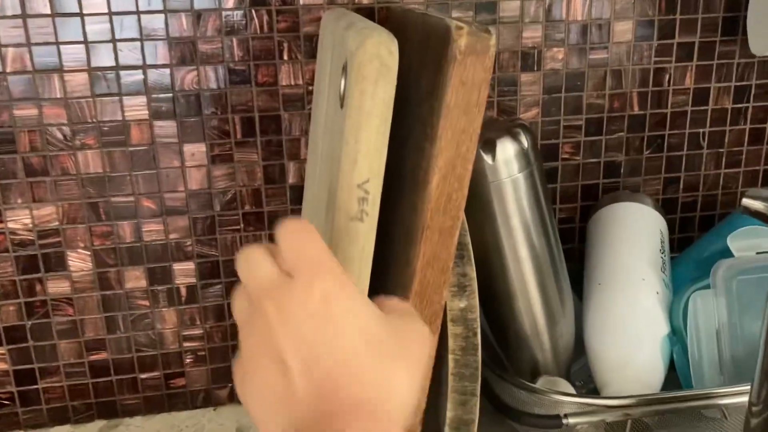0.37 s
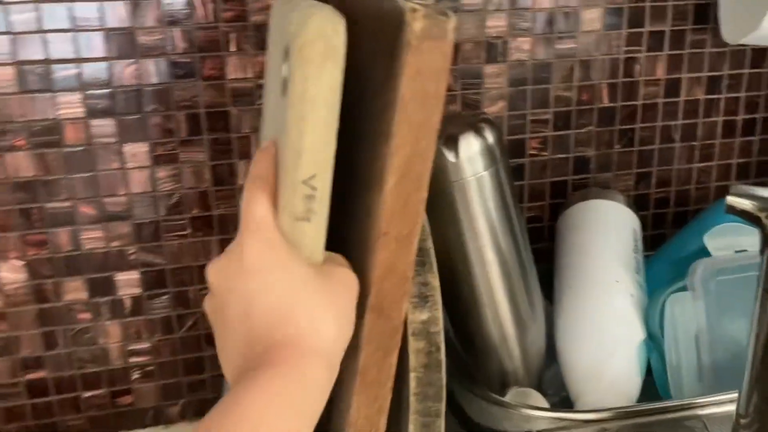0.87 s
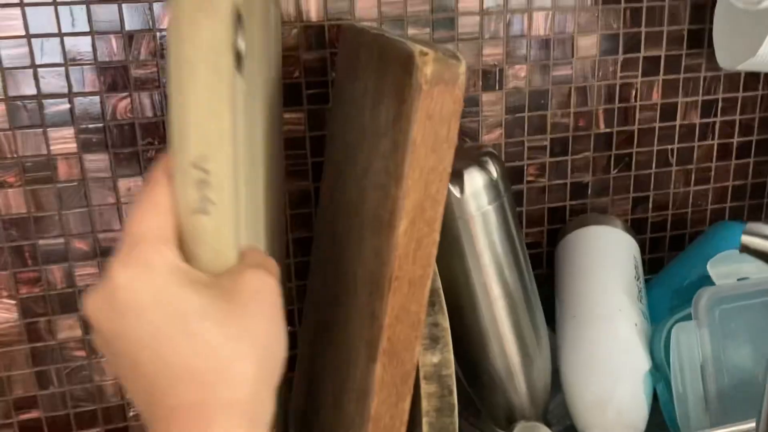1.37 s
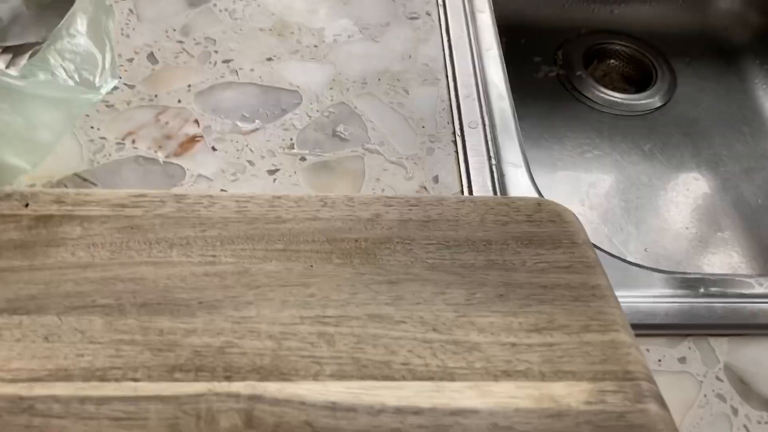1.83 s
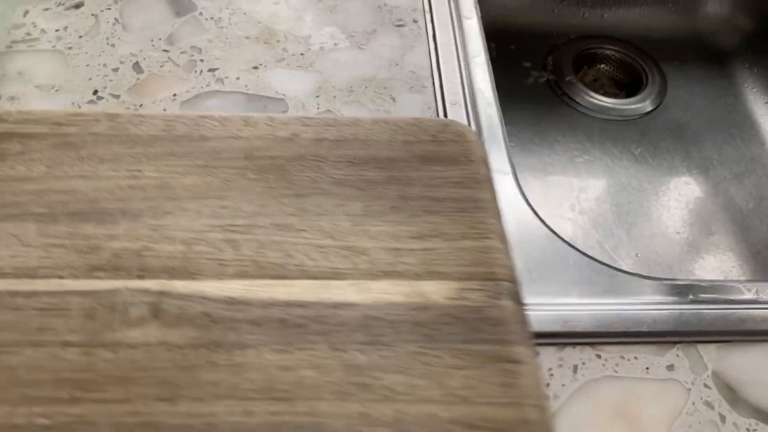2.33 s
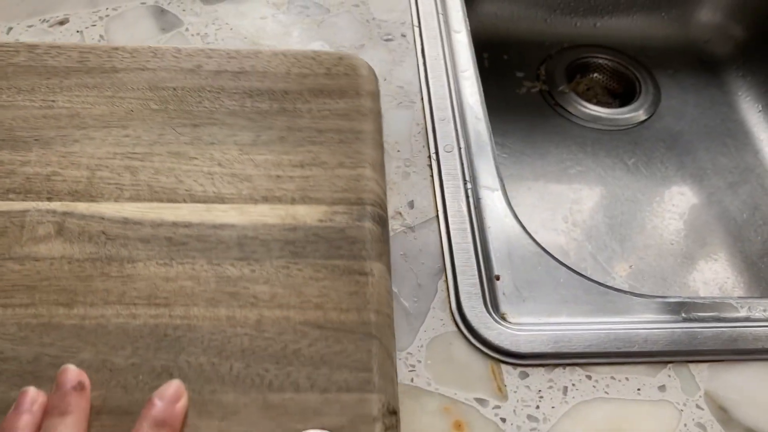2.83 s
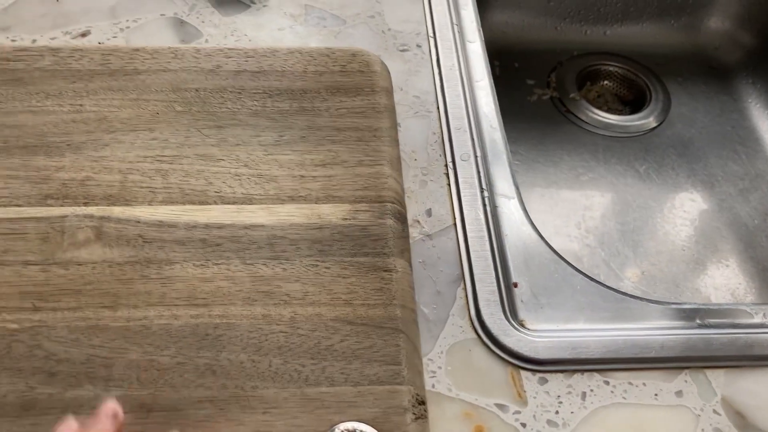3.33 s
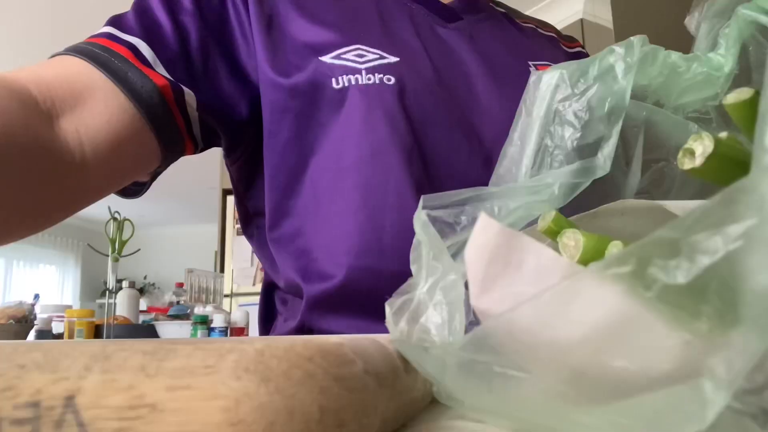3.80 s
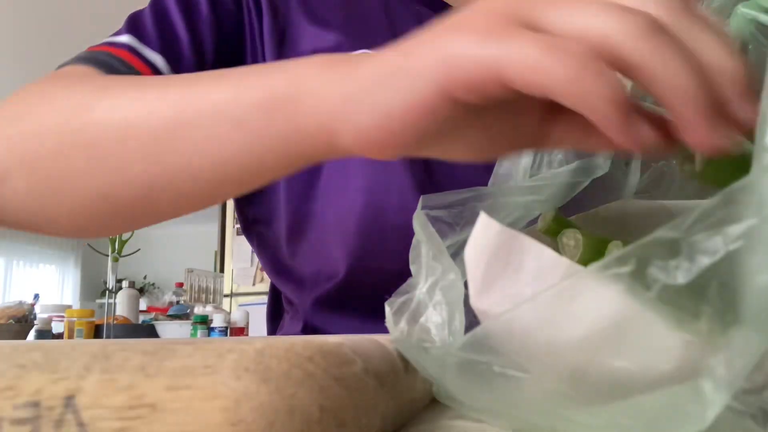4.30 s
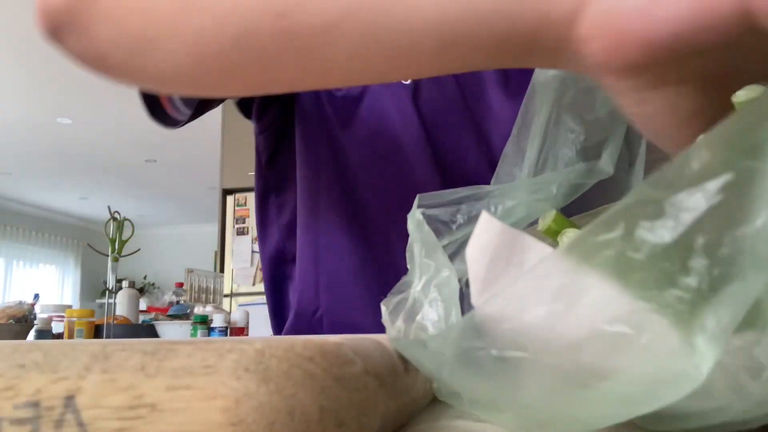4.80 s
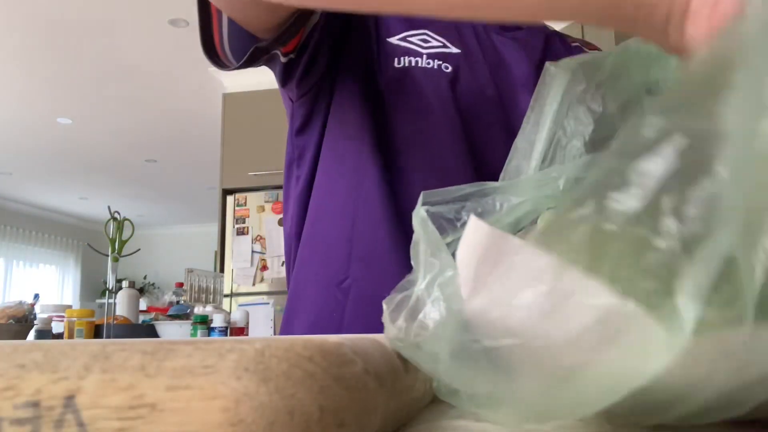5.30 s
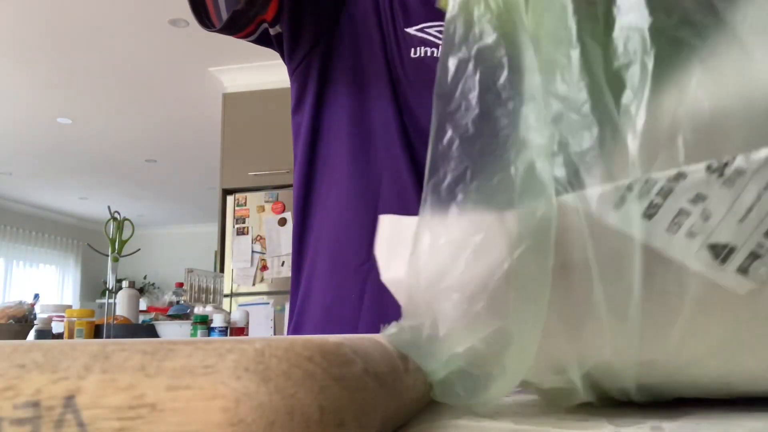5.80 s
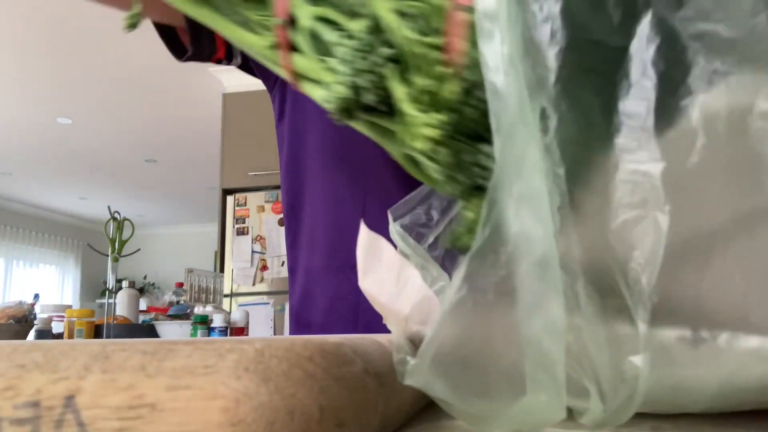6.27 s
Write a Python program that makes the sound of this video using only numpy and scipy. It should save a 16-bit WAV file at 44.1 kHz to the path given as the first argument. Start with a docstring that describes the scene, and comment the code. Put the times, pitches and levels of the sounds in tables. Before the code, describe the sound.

A handheld phone hears a hard, echoing kitchen close up, with faint wavering air and low hand bumps throughout. From 0 to 1 s there are only very soft taps of a wooden board in a steel rack, then a dull knock at 1.0. At 1.16-1.2 a cluster of hollow wood blows jangles the wires brightly; more knocks follow at 1.35, the hardest crack at 1.65 and a ringing clatter at 1.74. At 1.83 the sound cuts to a bench, on the left: gritty wood scrapes over stone from 2.05 to 2.85, hissing and singing, strongest near 2.45. The board slaps flat at 3.14, then its echo fades into quiet. From 3.8 the last part begins: sparse plastic crackle on the right from 4.4, a burst of snaps at 5.06, loud crumpling from 5.6, tiny squeaks around 5.8, and dense snapping at 6.0-6.2 before ending at 6.4.

```python
"""A kitchen in three joined shots, heard by a phone, over wavering air and low hand bumps.
First a wooden board is pulled from a steel dish rack: blows ring modes of wood and wire, with noisy clatter.
Then it slides over a stone bench, gritty clicks hissing and singing in its modes, and drops flat with a slap.
Last a hand pulls greens from a thin plastic bag: clumped clicks crackle, noise bursts snap, gliding tones squeak."""
import sys
import numpy as np
from scipy import signal
from scipy.fft import rfft, irfft, next_fast_len
from scipy.io import wavfile
from scipy.ndimage import uniform_filter1d

SR = 44100
rng = np.random.default_rng(int(sys.argv[2]) if len(sys.argv) > 2 else 0)


def put_to_file(sound):
    """Save the sound as 16-bit audio at rate SR, in the file named by the first command-line argument."""
    columns = np.atleast_2d(sound).T  # one column per channel
    safe = np.clip(columns, -1, 1)
    whole_steps = np.round(safe * 32767)
    wavfile.write(sys.argv[1], SR, whole_steps.astype(np.int16))


def level_to_linear(level):
    """Convert decibel levels to linear amplitude factors, elementwise."""
    exponent = np.asarray(level, float) / 20
    return 10 ** exponent


N = 282195  # samples in the whole scene


def evened(x):
    """Scales a sound to an rms of 1."""
    return x / np.sqrt(np.mean(x ** 2) + 1e-20)


def read(points, hz, column=1):
    """Reads a table column on a log-frequency axis."""
    table = np.transpose(points)
    return np.interp(np.log(hz + 1), np.log(table[0] + 1), table[column])


def curve(rows, column=1):
    """Joins a table column in time; -200 outside the table, far below hearing for a level."""
    table = np.transpose(rows)
    return np.interp(np.arange(N) / SR, table[0], table[column], left=-200, right=-200)


def shaped(x, gain):
    """Filters x by gain, a function of Hz."""
    size = next_fast_len(x.shape[-1] + 2048)
    spectrum = rfft(x, size) * gain(np.fft.rfftfreq(size, 1 / SR))
    return irfft(spectrum, size)[..., :x.shape[-1]]


def coloured(x, spectrum):
    """Gives x the colour of a spectrum table, at an rms of 1."""
    return evened(shaped(x, lambda hz: level_to_linear(read(spectrum, hz))))


def wander(width):
    """A random drift with an rms of 1, smoothed over width samples."""
    return evened(uniform_filter1d(rng.standard_normal(N), width))


def clicks(per_s, spread_db, size=N):
    """Random clicks of either sign, a few of them large."""
    chance, sign = rng.random((2, size))
    height = level_to_linear(spread_db * np.minimum(rng.exponential(1, size), 4))
    return (chance < per_s / SR) * np.sign(sign - .5) * height


def add(mix, s, sound):
    """Lays a sound into the mix at s seconds."""
    part = mix[round(s * SR):][:len(sound)]
    part += sound[:len(part)]


# Kitchen air by the rack and by the bench. Each row: frequency in Hz, density in dB per Hz.
RACK_AIR = [(59, -51), (100, -19.5), (343, -12), (381, -10.5), (662, -27.5), (9410, -45.5), (11400, -38),
            (16000, -56)]
BENCH_AIR = [(59, -31.5), (100, -8.5), (442, -15.5), (676, -29), (768, -33.5), (13800, -58), (16000, -52)]


def air(spectrum):
    """Coloured noise, nearly alike in both ears in the bass and mostly separate above, wavering in level."""
    left, other = rng.standard_normal((2, N))
    same = lambda hz: np.clip(.9 - hz / 900, .1, 1)
    right = shaped(left, same) + shaped(other, lambda hz: np.sqrt(1 - same(hz) ** 2))
    return coloured(np.array([left, right]), spectrum) * level_to_linear(2 * wander(3000))


# Low bumps, the hand moving on the phone. Each row: time in seconds, level in dB, hold in seconds.
HAND_BUMPS = [(.47, -61, 0.044), (1.015, -39, 0.199), (1.426, -47.5, 0.0128), (1.68, -32, .03),
              (2.906, -53, 0.024), (3.15, -32.5, 0.0305), (3.28, -45, 0.0426), (4.92, -44.5, 0.0056),
              (5.134, -59.5, 0.007), (5.97, -43.5, 0.078), (6.09, -44.5, 0.022), (6.313, -51, 0.0059)]
BUMP_RISE_DB_PER_S, BUMP_FALL_DB_PER_S = 700.5, 196


def handling(grip_db):
    """Low noise for the grip's steady tremor and the hand's bumps, partly opposite at the two microphones."""
    t = np.arange(N) / SR
    level = level_to_linear(grip_db)
    for s, db, hold in HAND_BUMPS:
        rise_db = BUMP_RISE_DB_PER_S * np.maximum(s - t, 0)
        fall_db = BUMP_FALL_DB_PER_S * np.maximum(t - s - hold, 0)
        level = level + level_to_linear(db - rise_db - fall_db)
    push, twist = rng.standard_normal((2, N))
    pair = np.array([push - .5 * twist, push + .8 * twist])
    return level * coloured(pair, [(15, -54), (35, -13.5), (55, 0.5), (95, -9.5), (130, -12.0), (300, -61.5)])


def ring(modes):
    """Impulse response of decaying sines, given as (Hz, dB, t60 in s), scaled to peak 1."""
    t = np.arange(SR // 2) / SR
    out = sum(level_to_linear(db - 60 * t / t60) * np.sin(2 * np.pi * hz * t) for hz, db, t60 in modes)
    return out / abs(out).max()


def contact(ms, rattle_t60, rattle_db):
    """Force of a blow: one push, then ever weaker rebounds; longer contact is duller."""
    t = np.arange(SR // 3) / SR
    train = level_to_linear(rattle_db - 60 * t / rattle_t60) * evened(clicks(1000, 0.978, size=len(t)))
    train[0] = 1
    u = t[:400] / (ms / 4000)  # the push peaks a quarter of the way into the contact
    push = u * np.exp(-u)
    return np.convolve(train, push / np.sum(push))


def clatter(force, keep, spectrum):
    """A burst of noise for every contact; it swells for a moment and dies."""
    dying = signal.lfilter([1], [1, -keep], abs(force))
    burst = signal.lfilter([1 - .93], [1, -.93], dying)
    return burst * coloured(rng.standard_normal(len(force)), spectrum)


# Blows in the rack. Each row: start in seconds, drive to the board, wires and clatter in relative dB,
# rattle t60 in seconds.
RACK_HITS = [(.003, -51, -57, -55, 0.117), (0.443, -56.5, -57.5, -52.5, 0.297),
             (.809, -54.5, -55.5, -42.5, 0.0593), (.948, -46.5, -58, -45.5, 0.054),
             (1.004, -23.5, -62.5, -38, 0.326), (1.112, -48, -47, -45, 0.54),
             (1.162, -22, -14.5, -13.5, 0.089), (1.168, -12.5, -20.5, -23, 0.2),
             (1.208, -20.5, -23, -26, 0.091), (1.341, -14, -28, -27.5, 0.15), (1.417, -19, -53, -45.5, .05),
             (1.641, -11.5, -51.5, -19, 0.09), (1.649, 8, -43, -13, 0.012),
             (1.743, -12, -15.5, -14.5, 0.097)]
# Modes of the wooden board. Each entry: frequency in Hz.
BOARD_MODES_HZ = [124, 228, 375, 540, 640, 880, 1010, 1232, 1420, 1530, 1910, 2250, 2570, 3070, 3430]
# The same modes' strength. Each row: relative dB held in the air, relative dB lying on stone,
# t60 in seconds in the air.
BOARD_MODES = [(-25, -19, 0.14), (-8.5, 7, 0.046), (-2, -15, 0.056), (-11, -4, 0.087), (-1.5, 1, 0.04),
               (-19, -3.5, 0.06), (-9.5, 0.5, 0.019), (8, 14.5, 0.016), (-8.5, -27, 0.04),
               (-3.5, -23, 0.019), (-16.5, 12.5, 0.014), (-12, -3.5, 0.15), (-21, -5.5, 0.21),
               (-16.5, -15.5, 0.073), (-18.5, -34.5, 0.05)]
# Steel wires, the near and the far set. Each row: frequency in Hz, relative level in dB, t60 in seconds.
NEAR_STEEL = [(2400, -12, .2), (2735, -10, .4), (2972, -10, .15), (3580, -12, .2), (4048, -10, .08),
              (4403, -4, .15), (5280, -12, .12), (5992, -12, .2), (6508, -13, .2), (6998, -12, .1),
              (7516, -4, .13), (10340, -22, .2), (11490, -24, .2)]
FAR_STEEL = [(1696, -6, .07), (2800, 3, .22), (3520, -5, .06), (4517, -6, .1), (5060, -8, .12),
             (5230, -12, .2), (6440, -15, .2), (6761, -18, .25), (7246, -19, .25), (10820, -22, .2),
             (11850, -22, .2)]
# Broad clatter of a hard contact. Each row: frequency in Hz, density in dB per Hz.
HARD_CRACK = [(150, -26), (300, 5.5), (1500, -3), (3000, 2.5), (5000, -6), (8000, -1), (16000, 0.5)]
CONTACT_MS, SHORTEN = 0.0446, 0.419  # contact at 0 dB on the wires; harder hits are shorter, dB per dB
CROSS_S, OTHER_WIRES_DB = 1.55, -19  # the edge moves from near to far wires; the set not struck is lower
CHATTER_DB, CHATTER_S = 3.5, .004  # loose wires buzz against each other while they ring


def rack():
    """Every blow drives the board's modes, two sets of wires and a broad clatter."""
    board_force, near_force, far_force, noise = np.zeros((4, N))
    for s, board_db, wires_db, clatter_db, rattle_t60 in RACK_HITS:
        ms = CONTACT_MS * level_to_linear(-SHORTEN * wires_db)
        force = contact(ms, rattle_t60, rattle_db=-27.0)
        add(board_force, s, level_to_linear(board_db) * force)
        add(near_force, s, level_to_linear(wires_db + OTHER_WIRES_DB * (s > CROSS_S)) * force)
        add(far_force, s, level_to_linear(wires_db + OTHER_WIRES_DB * (s <= CROSS_S)) * force)
        soft = lambda hz: 1 / (1 + (hz * ms / 1500) ** 2)  # a long contact dulls the clatter
        add(noise, s, level_to_linear(clatter_db) * shaped(clatter(force, 0.99713, HARD_CRACK), soft))
    held = [(hz, air_db, t60) for hz, (air_db, _, t60) in zip(BOARD_MODES_HZ, BOARD_MODES)]
    board = signal.oaconvolve(board_force, ring(held))[:N]
    edge = lambda force: 6 * np.diff(force, prepend=0)  # thin steel answers to the edge of the force
    near = signal.oaconvolve(edge(near_force), ring(NEAR_STEEL))[:N]
    far = signal.oaconvolve(edge(far_force), ring(FAR_STEEL))[:N]
    buzz = evened(level_to_linear(CHATTER_DB * wander(round(CHATTER_S * SR))))
    return board + (near + far) * buzz + noise


# Reverberation of the kitchen. Each row: frequency in Hz, t60 in seconds, relative level in dB.
KITCHEN_ROOM = [(100, 0.75, 3), (400, 0.689, 0.5), (1201.3, 0.7356, 1), (3000, .68, -1), (4340, 0.59, 3),
                (7000, 0.48, -0.5), (12000, .34, -4)]
FIRST_ECHO = 300  # samples
BASS_SHARED, BASS_OWN = 1.2, .7  # right ear's bass: from the left ear's tail, and its own


def kitchen():
    """Sparse taps of random sign for each ear, each band dying at its own speed after a quick early part."""
    taps = np.zeros((2, SR))
    jitter = rng.integers(0, 20, (2, (SR - FIRST_ECHO - 1) // 20))
    at = np.arange(FIRST_ECHO, SR - 20, 20) + jitter
    np.put_along_axis(taps, at, rng.choice([-1., 1.], at.shape), 1)
    hz, t, z = signal.stft(taps, SR, nperseg=256)
    # long waves reach both ears alike
    z[1] = np.where(hz[:, None] < 450, BASS_SHARED * z[0] + BASS_OWN * z[1], z[1])
    z *= level_to_linear(read(KITCHEN_ROOM, hz, column=2))[:, None]
    late = level_to_linear(-60 * t / read(KITCHEN_ROOM, hz)[:, None])
    early = 2.0 * level_to_linear(-60 * t / 0.058)
    tail = signal.istft(z * (late + early), SR, nperseg=256)[1]
    return tail / np.linalg.norm(tail[0])


SLIDING_RING, PRESSED_RING = 1.3, .4  # factor on the t60 while the board skims the stone, and pressed flat


def lying(ring_factor):
    """Modes of the board on stone: the contact changes their strength and how long they ring."""
    return [(hz, stone_db, ring_factor * t60)
            for hz, (_, stone_db, t60) in zip(BOARD_MODES_HZ, BOARD_MODES)]


def struck(force, spectrum):
    """The force rings a broad body with no pitch of its own; nothing sounds before the blow."""
    log_gain = np.log(level_to_linear(read(spectrum, abs(np.fft.fftfreq(4096, 1 / SR)))))
    minimum_phase = np.exp(np.conj(signal.hilbert(log_gain)))
    body = np.fft.ifft(minimum_phase).real[:2048]
    return signal.oaconvolve(force, body / abs(body).max())[:len(force)]


# Blows on the bench. Each row: start in seconds, drive to the board and slap in relative dB,
# contact in ms, rattle t60 in seconds.
BENCH_HITS = [(1.934, -57.5, -76, 0.2915, 0.0152), (2.423, -27.5, -51.5, 0.66, 0.022),
              (3.1433, -6, -29.5, 0.26, 0.0262), (3.156, -30, -51.5, 2.4, 0.037),
              (3.65, -50, -88, 1.57, 0.11), (3.855, -43.5, -93.5, 1.366, 0.01),
              (3.953, -47, -82.5, 2.2, 0.02595)]
# Flat wood slapping stone. Each row: frequency in Hz, density in dB per Hz.
WOOD_SLAP = [(90, -18), (130, -2), (300, -3), (700, -0.5), (1600, -5.5), (3000, -5.5), (4400, -15.5),
             (6000, -34.5), (16000, -40)]


def bench_blows():
    """Blows on stone ring the damped board and slap, part noise burst and part unpitched body."""
    board_force, slap_force = np.zeros((2, N))
    for s, board_db, slap_db, ms, rattle_t60 in BENCH_HITS:
        force = contact(ms, rattle_t60, rattle_db=-15)
        add(board_force, s, level_to_linear(board_db) * force)
        add(slap_force, s, level_to_linear(slap_db) * force)
    board = signal.oaconvolve(board_force, ring(lying(PRESSED_RING)))[:N]
    burst = level_to_linear(6) * clatter(slap_force, 0.99675, WOOD_SLAP)
    return board + burst + level_to_linear(24.5) * struck(slap_force, WOOD_SLAP)


def rubbed(low_hz, high_hz, ring_factor):
    """Random clicks of grit ring the board's modes between two frequencies, at an rms of 1."""
    modes = [mode for mode in lying(ring_factor) if low_hz < mode[0] < high_hz]
    return evened(signal.oaconvolve(clicks(1500, 5.2), ring(modes))[:N])


# The slide. Each row: time in seconds, speed as hiss level in dB, rubbing place from 0 to 1, going from
# a crest of the 880 Hz mode to a crest of the 640 Hz mode.
SLIDE_PATH = [(2.0, -72, 0.39), (2.042, -49, 0.1), (2.11, -46.5, .45), (2.19, -49, 0.3), (2.296, -53, 0.5),
              (2.394, -48.5, 0.2), (2.422, -50, 1), (2.466, -43.5, 0), (2.58, -44.5, 1),
              (2.704, -52.5, 0.5), (2.802, -49.5, .95), (3.014, -67.5, 0.1), (3.11, -54, .6)]
# Each push starts with weight on the stone and the low modes drone. Each row: start and end in seconds,
# level in dB, fall in dB per second.
WEIGHTED_PUSHES = [(2.049, 2.408, -48.5, 32), (2.406, 2.7, -43, 139)]
# Hiss of the grit. Each row: frequency in Hz, density in dB per Hz.
GRIT_HISS = [(700, -23), (1500, 3), (4000, -2), (8000, -8), (12000, -4.5), (16000, -17)]
HIGH_DB, CREST_880_DB, CREST_640_DB, LOW_DB = -2, -2.5, 1, -11  # singing of the modes, over the hiss


def slide():
    """Grit under the board hisses and makes its modes sing, the rubbing place choosing which."""
    t = np.arange(N) / SR
    speed = level_to_linear(curve(SLIDE_PATH))
    place = np.pi / 2 * np.clip(curve(SLIDE_PATH, column=2), 0, 1)
    drone = 0
    for start, end, db, fall in WEIGHTED_PUSHES:
        fade = np.clip(np.minimum(t - start, end - t) / 0.0068, 0, 1)
        drone = drone + level_to_linear(db - fall * (t - start)) * fade
    high = speed * level_to_linear(HIGH_DB) * rubbed(950, 5000, SLIDING_RING)
    crest_880 = speed * level_to_linear(CREST_880_DB) * np.cos(place) * rubbed(750, 950, SLIDING_RING)
    crest_640 = speed * level_to_linear(CREST_640_DB) * np.sin(place) * rubbed(500, 750, SLIDING_RING)
    low = (speed * level_to_linear(LOW_DB) + drone) * rubbed(0, 500, PRESSED_RING)
    hiss = speed * coloured(clicks(11000, 1.8), GRIT_HISS)
    return high + crest_880 + crest_640 + low + hiss


# Dry ticks of fingers and edges on wood. Each row: time in seconds, drive in relative dB.
DRY_TICKS = [(2.9891, -57.5), (3.0196, -59), (3.1418, -32), (3.159, -43.5), (3.4094, -71.5), (3.5055, -72),
             (3.5301, -75), (3.5824, -83.5), (3.6989, -74)]
# Bright crackle of thin film, which also colours the ticks. Each row: frequency in Hz, density in dB per Hz.
THIN_FILM = [(1500, -30), (2800, -3), (6000, -1.5), (8500, 4), (12000, -0.5), (14000, 4.5), (16500, -2)]


def ticks():
    """Each tick is a very short bright burst of noise."""
    force = np.zeros(N)
    for s, db in DRY_TICKS:
        add(force, s, level_to_linear([db]))
    return clatter(6 * force, 0.95504, THIN_FILM)


# The hand working the bag. Each row: time in seconds, crackle level in dB.
BAG_CRACKLE = [(4.33, -84.5), (4.37, -57), (4.42, -47), (4.63, -56.5), (4.76, -45.5), (4.82, -47),
               (5.07, -39.5), (5.1, -48), (5.65, -33), (5.87, -39.5), (5.95, -36.5), (6.01, -42),
               (6.05, -36.5), (6.27, -47.5), (6.31, -43.5), (6.4, -63)]
# The duller body of the film. Each row: frequency in Hz, density in dB per Hz.
FILM_BODY = [(59, -14), (100, 2.5), (280, -5.5), (481, -5), (1560, -8), (1900, -3), (2820, -9.5),
             (3160, -8.5), (5000, -19), (6500, -46), (11000, -120)]
# Loud creases snapping. Each row: start in seconds, relative level in dB, decay time constant in ms.
CREASE_SNAPS = [(5.0543, -23.5, 5.13), (5.067, -17, 3.42), (5.4175, -30, 3.4), (5.7201, -23.5, 2.47),
                (5.9597, -33, 2.6), (6.0376, -17.5, 4.83), (6.0676, -23.5, 4.8), (6.095, -14.5, 2.9),
                (6.1199, -18.5, 5.4), (6.1902, -22.5, 5.9)]
# Wet stalks squeaking on the film. Each row: start in seconds, length in seconds, start and end pitch in Hz,
# level of the fundamental in dB.
STALK_SQUEAKS = [(5.786, 0.031, 500.5, 437, -37.5), (5.845, 0.0247, 466.6, 645, -37.5),
                 (5.871, 0.031, 964.4, 922, -41)]
BODY_DB, BODY_FOLLOWS = -17.5, 0.6712  # body follows the crackle: dB at 0 dB crackle, dB per dB
OVERTONE_DB, OVERTONE_DB_PER_OCTAVE = -5.5, 10.5  # at 500 Hz; faster slips squeak brighter


def bag():
    """Thousands of tiny creases snap in clumps; larger folds thud and stalks squeak."""
    crackle_db = curve(BAG_CRACKLE)
    creases = (clicks(9000, 2.2) + 4 * clicks(120, 1.2)) * level_to_linear(1.5 * wander(300))
    folds = clicks(3000, 2.06) * level_to_linear(1.5 * wander(600))
    crackle = level_to_linear(crackle_db) * coloured(creases, THIN_FILM)
    body = level_to_linear(BODY_DB + BODY_FOLLOWS * crackle_db) * coloured(folds, FILM_BODY)

    dull, bright = rng.standard_normal((2, N))
    grain = coloured(dull, FILM_BODY) + 0.88 * coloured(bright, THIN_FILM)
    burst = np.zeros(N)
    for s, db, ms in CREASE_SNAPS:
        add(burst, s, level_to_linear(db) * np.exp(-np.arange(2000) / (max(ms, .3) * SR / 1000)))

    squeaks = np.zeros(N)
    for s, length, start_hz, end_hz, db in STALK_SQUEAKS:
        glide_hz = np.linspace(start_hz, end_hz, round(length * SR))
        turn = 2 * np.pi * np.cumsum(glide_hz) / SR
        overtone = level_to_linear(OVERTONE_DB + OVERTONE_DB_PER_OCTAVE * np.log2(end_hz / 500))
        tone = np.sin(turn) + overtone * np.sin(2 * turn)
        add(squeaks, s, level_to_linear(db) * signal.windows.tukey(len(turn), .5) * tone)
    return crackle + body + squeaks + 0.2685 * burst * grain


# How the rack, then near sounds on the left and on the right, reach the microphone pair.
# Each row: frequency in Hz, left over right in dB, lead of the left in radians.
RACK_SIDE = [(119, -5, 0.22), (300, 6, 0.51), (1000, 2.5, 0.25), (1700, 8, 1.3), (2866, 1.5, 1.7),
             (4200, -0.5, 6.49), (6450, -0.5, 4.66)]
LEFT_SIDE = [(100, 4.5, 0.2024), (359.1, 3.5, 0.21), (866.2, 10.5, 1.8), (1385, 7.5, 0.83), (2695, 3, 7.21),
             (5400, 2.5, 7.46), (6900, 12.5, 10)]
RIGHT_SIDE = [(88.4, -5.5, 0), (346, -12.5, -1.71), (826, -14, -2), (1305, -12, -2.5), (2466, -5.5, -5),
              (5490, -10.5, -8), (7000, -0.5, -17.5)]


def placed(near, side):
    """Splits a near sound between the microphones, in level and in phase."""
    half = lambda hz: level_to_linear(read(side, hz) / 2) * np.exp(.5j * read(side, hz, column=2))
    return np.array([shaped(near, half), shaped(near, lambda hz: 1 / half(hz))])


# The three shots. Each row: start in seconds, fade in in seconds, end in seconds, fade out in seconds.
SHOT_TIMES = [(-.01, .0043, 1.843, .026), (1.83, .0345, 3.803, .035), (3.8, .036, 6.42, .03)]
# Levels for each shot. Each entry: level in dB, for the air, the room and the steady tremor of the grip.
SHOT_AIR_DB = [-71, -64, -62]
SHOT_ROOM_DB = [-8.5, -4, -6.5]
SHOT_GRIP_DB = [-69, -74.5, -62]


def scene():
    """Joins three shots, each with its own sources, side, air and fades."""
    t, tail, out = np.arange(N) / SR, kitchen(), 0
    board_on_stone = bench_blows() + slide()
    # bench sounds after the last join belong to the bag's shot
    sources = [rack(), board_on_stone + ticks(), bag() + board_on_stone * (t > SHOT_TIMES[2][0])]
    sides = [RACK_SIDE, LEFT_SIDE, RIGHT_SIDE]
    airs = [air(RACK_AIR), air(BENCH_AIR), air(BENCH_AIR)]
    for near, side, still, (start, rise, end, fall), air_db, room_db, grip_db in zip(
            sources, sides, airs, SHOT_TIMES, SHOT_AIR_DB, SHOT_ROOM_DB, SHOT_GRIP_DB):
        # near sounds are thinned below about 80 Hz
        near = shaped(near * (t > start), lambda hz: hz ** 2 / (hz ** 2 + 80 ** 2))
        wet = level_to_linear(room_db) * signal.oaconvolve(near[None], tail, axes=1)[:, :N]
        fade = np.clip(np.minimum((t - start) / rise, (end - t) / fall), 0, 1) ** 2
        out = out + fade * (placed(near, side) + wet + level_to_linear(air_db) * still + handling(grip_db))
    return out


def top_cut(x):
    """Nothing passes above the cut-off."""
    return signal.sosfilt(signal.butter(12, 16790, fs=SR, output="sos"), x)


# Above this the phone feeds both ears from one microphone, one ear late.
TREBLE_HZ, TREBLE_LAG_S = 6917, 1 / 4600
CEILING = .98  # full scale is 1


def record(dry):
    """One microphone's treble feeds both ears; the phone is turned for the last shot; peaks saturate softly."""
    share = lambda hz: 1 / (1 + (TREBLE_HZ / (hz + 1)) ** 16)
    treble = shaped(dry[0], lambda hz: np.sqrt(share(hz)))
    late = shaped(treble, lambda hz: np.exp(-2j * np.pi * hz * TREBLE_LAG_S))
    before_turn = np.arange(N) / SR < SHOT_TIMES[2][0]
    treble_pair = np.where(before_turn, [-late, treble], [treble, late])
    both = shaped(dry, lambda hz: np.sqrt(1 - share(hz))) + treble_pair
    return top_cut(CEILING * np.tanh(both / CEILING))


dry = scene()
out = record(dry)
put_to_file(out)
```